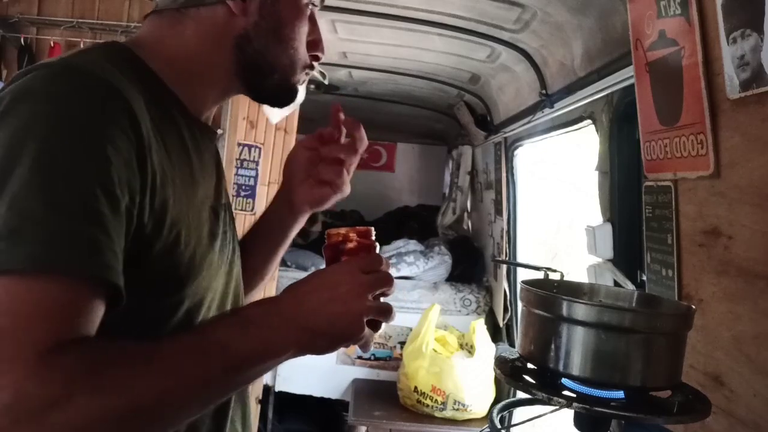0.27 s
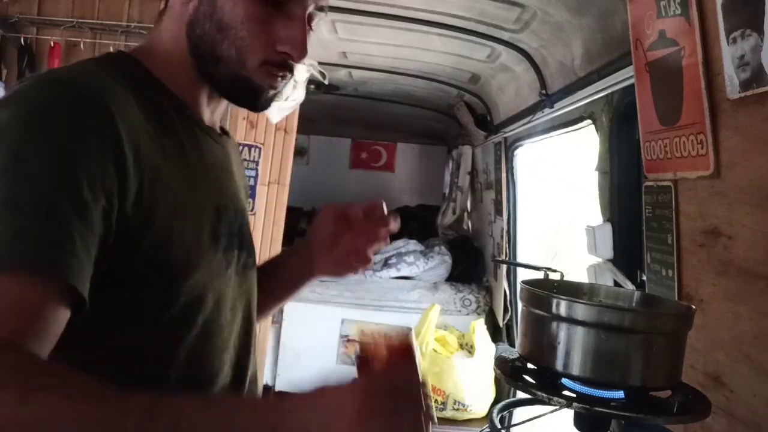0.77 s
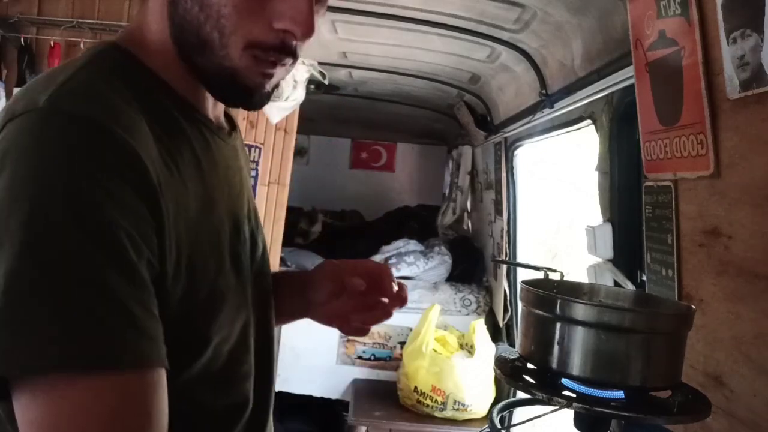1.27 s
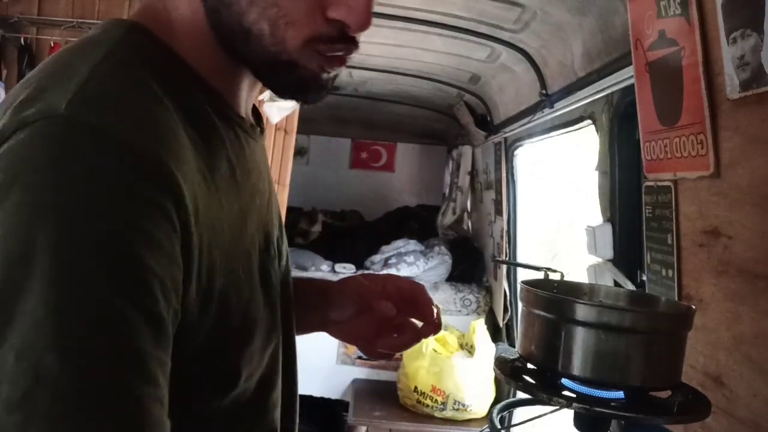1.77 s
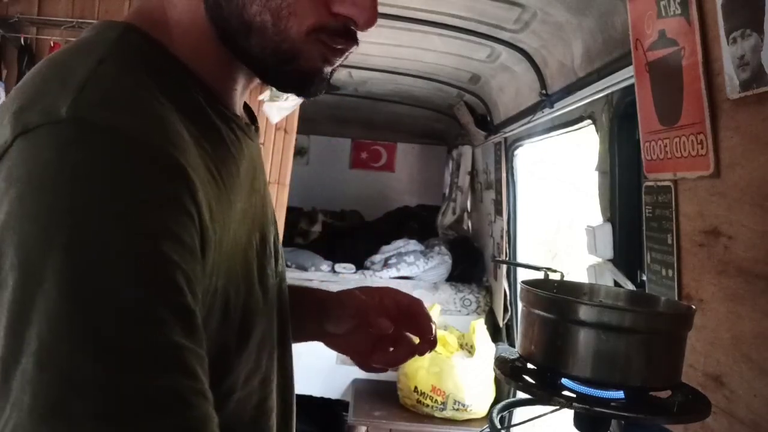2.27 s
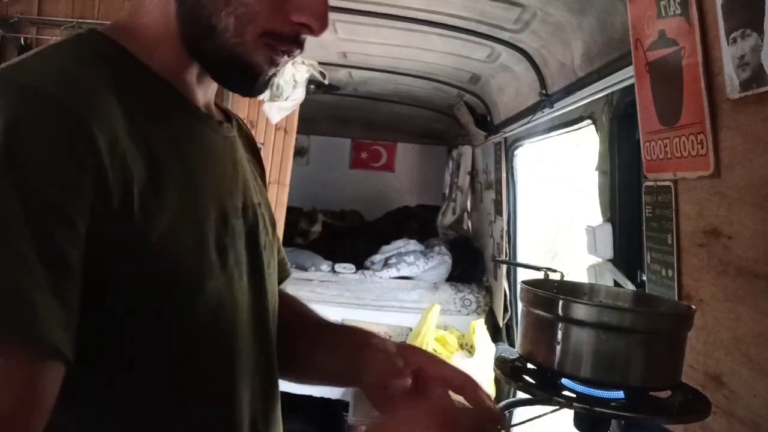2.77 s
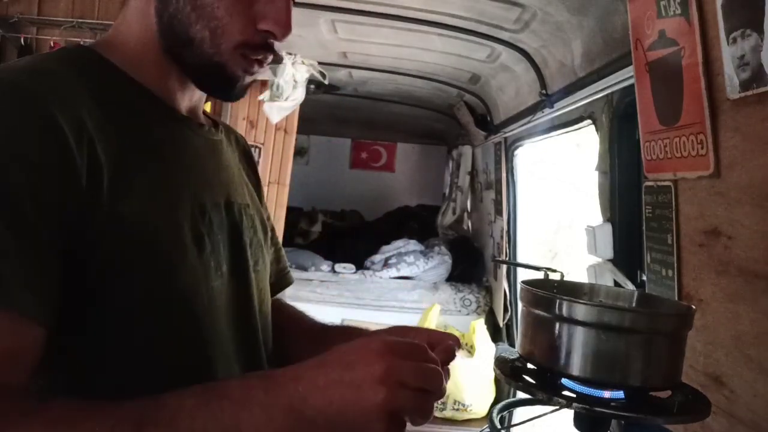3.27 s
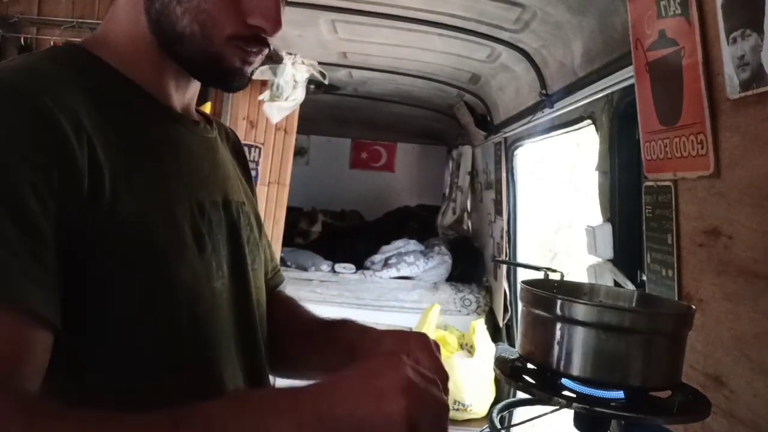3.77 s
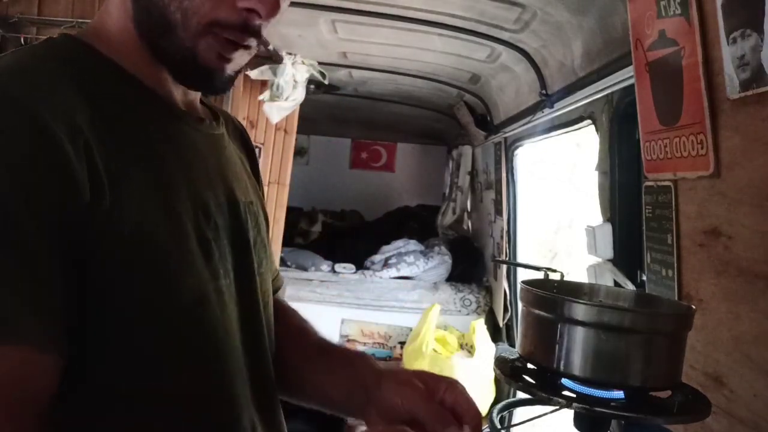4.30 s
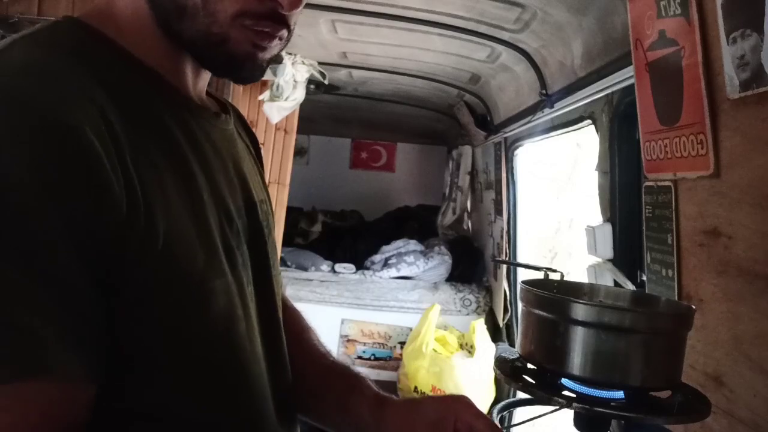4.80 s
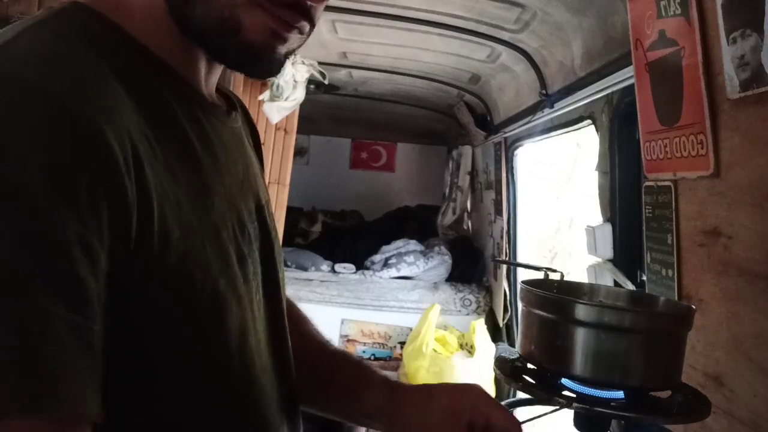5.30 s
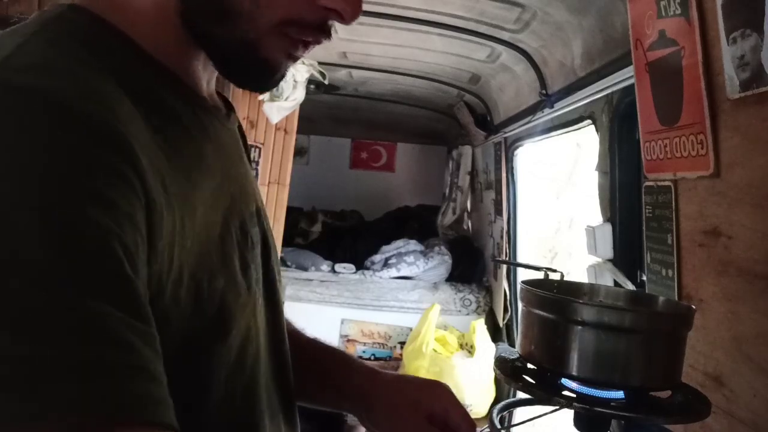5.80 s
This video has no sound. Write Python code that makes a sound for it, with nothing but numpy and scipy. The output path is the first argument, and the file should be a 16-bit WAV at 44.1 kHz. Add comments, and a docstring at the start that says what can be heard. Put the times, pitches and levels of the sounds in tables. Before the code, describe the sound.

Steady fluttering gas flame under a pot, with a bouncing wooden knock early on and scattered dry ticks and tiny crackles from busy hands.

```python
"""Gas ring in a cramped van kitchen

A pot's gas flame is two bands of fluttering noise; its jet hiss is broad noise plus flickering resonances.
Something set down on the wooden worktop knocks and bounces: soft pushes ring the board's modes.
Small things tick and crackle in a cook's hands: rattle bursts through resonators, and grainy noise.
Two spaced ports hear it, with close reflections on the handling; the finished sound is thin
from 9 to 11.5 kHz."""
import sys
import numpy as np
from scipy import signal
from scipy.fft import rfft, irfft, next_fast_len
from scipy.io import wavfile
from scipy.ndimage import uniform_filter1d, map_coordinates

SR = 44100
rng = np.random.default_rng(int(sys.argv[2]) if len(sys.argv) > 2 else 0)


def pcm_store(signal):
    """Save signal as 16-bit PCM."""
    levels = np.round(np.clip(np.atleast_2d(signal), -1, 1) * 32767)
    wavfile.write(sys.argv[1], SR, levels.astype(np.int16).T)


N = 266805
LENGTH = next_fast_len(N)
HZ = np.maximum(np.arange(LENGTH // 2 + 1) * SR / LENGTH, 1)

# Low flame roar spectrum. Each row: frequency in Hz, relative density in dB.
LOW_ROAR_SPECTRUM = [(15, -77), (25, -56), (48, -52), (58, -26), (101, -5), (145, -1), (248, -2),
                     (279, -0.5), (312, -19), (340, -28), (440, -80), (750, -120)]
# Upper flame roar spectrum. Each row: frequency in Hz, relative density in dB.
UPPER_ROAR_SPECTRUM = [(200, -20.5), (340, 2.5), (355, -3), (489, 2.5), (584, -6.5), (917, -16), (992, -19),
                       (1100, -19), (1430, -25.5), (2420, -120)]
# Low roar loudness. Each row: time in seconds, level in dB.
LOW_ROAR_LEVEL = [(0.0, -44), (0.3, -46.5), (0.74, -44.5), (1.4, -43.5), (2.17, -45.5), (3.57, -43.5),
                  (3.82, -47), (4.2, -43), (4.7, -45.5), (6.05, -44)]
# Upper roar loudness. Each row: time in seconds, level in dB.
UPPER_ROAR_LEVEL_DB = [(0, -54), (1.2, -53.5), (2.5, -53.5), (3.5, -55), (4.8, -53.5), (6.05, -53.5)]
# Roar power shared by the ports. Each row: frequency in Hz, share from 0 to 1.
ROAR_SHARED = [(30, 0.57), (130, 1), (300, 0.9), (500, 1), (650, 0.55), (800, 0.44), (1100, 0.084)]
# Roar balance. Each row: frequency in Hz, left minus right in dB.
ROAR_PAN = [(60, 0.5), (200, -1.5), (380, -5), (700, 1), (1200, 1.5)]
# Roar phase between ports. Each row: frequency in Hz, left lead in radians.
ROAR_LEAD = [(30, -0.16), (200, -0.055), (500, -0.74), (1100, -0.64)]

# Broad jet noise spectrum. Each row: frequency in Hz, relative density in dB.
JET_SPECTRUM = [(500, -8), (900, -16), (1500, -8.5), (2000, -9), (2600, -11), (3500, -11), (4700, -10.5),
                (5100, -14), (6000, -13.5), (7000, -19), (7800, -12), (8300, -18), (11800, -21),
                (12700, -27), (14000, -15.5), (15000, -18), (16000, -5.5)]
# Burner resonances in the hiss. Each row: frequency in Hz, nominal width in Hz, left and right relative dB.
BURNER_MODES = [(3200, 260, -16, -8), (3500, 260, -5, -8), (3750, 140, -2, 3), (3990, 200, 0, -1),
                (4300, 280, -3.5, -7), (4620, 220, -7, -7), (5380, 110, -1, -11), (5590, 120, -7, -15),
                (6270, 300, -1, -6), (6650, 340, -7, -9), (7080, 340, -10, -24), (7500, 260, -7, -10),
                (8450, 170, -14, -4), (13100, 350, -19, -16), (14350, 400, -14, -8)]
# Hiss phase between ports, also used for rustles. Each row: frequency in Hz, left lead in radians.
JET_LEAD = [(0, 0), (1500, -2.5), (2000, -4), (2600, -3.5), (3100, -4.8), (3400, -6.3), (3750, -8.5),
            (4100, -7.7), (4400, -5.8), (5000, -9.3), (5350, -12.6), (6000, -9.9), (6300, -11.2),
            (7000, -12.6), (8400, -15.9), (9500, -18.8), (12200, -22.6), (13000, -25.6), (13400, -23),
            (14200, -24.6), (14800, -27.5), (16000, -27)]
JET_DB, FLICKER_DB = -55.5, 1.8
JET_SHARED, BURNER_SHARED = .2, .75   # share of power common to both ports

# Ticks and crackles. Each row: time in seconds, lower pitch in Hz, its relative level in dB,
# upper pitch in Hz, its relative level in dB, rattle t60 in seconds (held to 0.01-0.2).
TICK_EVENTS = [(1.0265, 1340, -42.5, 6800, -59, 0.01), (1.1544, 3090, -43.5, 12040, -42.5, 0.063),
               (1.1566, 2200, -40, 1280, -47, 0.038), (1.188, 3500, -55, 6870, -55, 0.023),
               (1.202, 4400, -49, 6900, -48.5, 0.068), (1.207, 1160, -41, 3200, -67, 0.029),
               (1.3412, 980, -47.5, 5600, -54, 0.087), (1.4362, 1460, -44, 6760, -49.5, 0.11),
               (1.4415, 2550, -52, 3640, -47, 0.077), (1.461, 3750, -49.5, 6800, -71, 0.06),
               (1.8076, 2480, -56.5, 6800, -51, 0.071), (1.897, 2130, -53, 13000, -49, 0.019),
               (1.9382, 1030, -45, 2420, -56, 0.067), (1.947, 2870, -39, 3490, -44, 0.02),
               (1.958, 3300, -51, 6400, -68, .015), (2.505, 6340, -43.5, 7200, -52, 0.041),
               (2.5058, 1080, -45, 2000, -43.5, 0.033), (2.5085, 3730, -42, 6300, -52, 0.023),
               (2.515, 1000, -60, 3500, -44.5, 0.036), (2.556, 2200, -57, 6300, -64, 0.017),
               (2.617, 2100, -56, 12000, -52, 0.027), (2.599, 1400, -54, 9000, -57, 0.037),
               (3.0496, 800, -54, 4940, -49, 0.021), (3.267, 6400, -44, 7400, -57, 0.013),
               (3.2735, 1120, -46, 5300, -42, 0.04), (3.2738, 2200, -36.5, 3200, -36, 0.022),
               (3.2805, 2280, -47, 3490, -48, .015), (3.2988, 2110, -56, 7400, -52.5, 0.062),
               (4.038, 5700, -40, 7640, -45.5, 0.032), (4.0440, 2390, -36, 3300, -44, 0.011),
               (4.0437, 5000, -60, 7260, -49, 0.015), (4.0828, 1210, -46.5, 2480, -48, 0.076),
               (4.106, 4800, -46, 6400, -50, 0.034), (4.221, 800, -70, 6800, -47.5, .02),
               (4.2463, 830, -37, 1290, -37, 0.009), (4.2463, 2120, -45, 680, -36, .01),
               (4.2525, 820, -44, 1500, -53, .02), (4.259, 840, -53, 1510, -50, 0.03),
               (4.8525, 7550, -41.5, 12800, -39, 0.019), (4.9088, 3300, -43, 1300, -56, 0.018),
               (4.917, 1330, -45, 6600, -39.5, 0.045), (4.9208, 800, -51, 12000, -55, 0.023),
               (4.9664, 5000, -46, 13000, -45, 0.046), (4.986, 4470, -44, 12000, -48, 0.035),
               (5.0165, 1940, -52, 6800, -55, 0.05), (5.1896, 1150, -45, 7300, -49, 0.027),
               (5.2005, 3280, -45.5, 7430, -42.5, 0.048), (5.2075, 1280, -48, 12000, -46, 0.022),
               (5.3648, 7300, -46.5, 5400, -50, 0.021), (5.6483, 3500, -55, 6800, -56, 0.024),
               (5.682, 970, -45, 4500, -52, 0.038), (5.7262, 2960, -52.5, 6950, -51.5, 0.093),
               (5.804, 6600, -47, 13000, -50, 0.048), (5.8317, 2220, -56.5, 13000, -45.5, .03),
               (5.872, 2050, -54, 6800, -42, 0.016)]
# Resonances of the small things. Each row: frequency in Hz, nominal width in Hz, relative level in dB.
SMALL_MODES = [(680, 170, -6), (820, 120, 2), (1080, 220, -2), (1280, 260, -6), (1460, 240, -3),
               (1650, 260, -6), (2040, 190, 1), (2280, 220, -1), (2550, 240, -5), (2870, 200, -5),
               (3200, 200, 0), (3490, 210, -1), (3730, 200, -1), (4000, 260, -4), (4350, 350, -5),
               (4800, 400, -6), (5300, 350, -4), (6280, 360, -5), (6800, 360, -7), (7350, 320, -1),
               (8340, 500, -6), (11530, 1900, -3), (13700, 1800, -6), (14700, 1800, 2)]
TICK_RISE_S, TICK_PEAK_S, TICK_LAG_S = .0009, .001, .00011   # e-fold rise, peak delay, right port's lag
SNAP_DB, TICK_SCATTER_DB = 14, 2
# modes nearest a pitch stand out of a broad spread
TICK_NEAR_DB_PER_OCTAVE, TICK_SPREAD_DB, TICK_FALL_DB_PER_OCTAVE = 80, -7, 15

# Blows on the worktop. Each row: time in seconds, relative strength in dB, contact sharpness in Hz,
# spot (0 first, 1 where it bounces to).
BLOWS = [(1.055, -15.5, 59, 0), (1.066, -12.5, 66, 0), (1.3412, -35, 350, 0), (1.4345, -15, 415, 0),
         (1.4381, -21, 460, 0), (1.4421, -7.5, 340, 0), (1.6059, -22.5, 212, 1), (1.6115, -17, 242, 1),
         (1.637, -24, 117, 1), (1.668, -28, 122, 1), (1.6937, -27, 107, 1), (1.752, -31, 120, 1),
         (4.815, -25, 70, 0)]
# Worktop modes. Each row: frequency in Hz, relative level in dB, t60 in seconds, left minus right in dB.
WORKTOP_MODES = [(106, -18.5, 0.17, -2), (124, -27, 0.6, -1.5), (142, -20, 0.17, -2.5), (161, -4, 0.14, -1),
                 (193, -17, 0.24, 0.5), (240, -9, 0.06, -3), (295, -8.5, 0.11, -6), (336, -2.5, 0.052, 1.5),
                 (423, -11, 0.115, 0), (492, -20.5, 0.17, -2), (565, -4, 0.064, -1.5), (621, -9, 0.078, 0),
                 (680, -10, 0.085, 2.5), (808, -13.5, 0.06, -1), (837, -7.5, 0.066, 12),
                 (951, -8, 0.078, 11), (1040, -13.5, 0.065, -7), (1232, -15, 0.06, 1)]
# Extra drive of the modes from the second spot. Each row: frequency in Hz, gain in dB.
SECOND_SPOT_DRIVE = [(106, -3), (161, 2.5), (240, -3), (336, -8), (423, -2), (492, 6), (565, 5), (680, 0),
                     (808, -7), (951, -1), (1040, -8)]
KNOCK_LAG_S = .0002   # right port's lag

# Rustles of a wrapper or skin. Each row: middle in seconds, half length in seconds, level in dB.
RUSTLE_SWELLS = [(1.16, .006, -60), (1.444, .010, -55), (1.456, .009, -60), (2.512, .008, -59),
                 (2.605, .015, -65), (3.278, .007, -58), (4.045, .006, -60), (4.092, .014, -63),
                 (4.918, .010, -57), (4.97, .004, -58), (4.99, .004, -58), (5.01, .015, -64),
                 (5.203, .013, -55), (5.236, .005, -65), (5.368, .004, -61), (5.79, .025, -65),
                 (5.878, .01, -62)]
# Rustle spectrum. Each row: frequency in Hz, relative density in dB.
RUSTLE_SPECTRUM = [(600, -30), (1200, -7), (2500, -7), (3500, -4), (5000, -7), (7300, 0), (8500, -5),
                   (12000, -3), (16000, -3)]
RUSTLE_GRAINS_PER_S, RUSTLE_SHARED = 7000, .5

CABIN_T60_S, ALIKE_BELOW_HZ = 0.14, 200
WALL_BASS_HZ, WALL_CUT_HZ = 296, 11000
TICK_ECHO_DB, KNOCK_ECHO_DB = -15, -14

# Overall tone colour, thin from 9 to 11.5 kHz. Each row: frequency in Hz, gain in dB.
OVERALL_COLOUR = [(20, -0.5), (8500, 0.5), (8600, -8), (9100, -2.5), (9500, -11), (11000, -14.5),
                  (11400, -51), (11650, 3), (13000, 4), (20000, -12.5)]
CUTOFF_HZ = 15780


def from_db(db):
    """Decibels to gain."""
    return 10 ** (np.asarray(db) / 20)


def rms_one(x):
    """Scale to rms 1."""
    return x / np.sqrt(np.mean(x ** 2) + 1e-20)


def at_hz(points):
    """A (Hz, value) table read at every bin, straight on a log axis."""
    hz, value = np.transpose(points)
    return np.interp(np.log(HZ), np.log(hz), value)


def at_time(points):
    """A (s, value) table read at every sample."""
    return np.interp(np.arange(N) / SR, *np.transpose(points))


def drift(knots_per_s):
    """Slow smooth chance through random knots; knot spread 1."""
    knots = rng.standard_normal(400)
    return map_coordinates(knots, [np.arange(N) / SR * knots_per_s], order=3, mode="wrap")


def stereo_noise(gains, share, lead_table):
    """Two ports share part of a noise, shifted in phase by its paths; the rest is their own. rms 1."""
    shared, left, right = rfft(rng.standard_normal((3, LENGTH)))
    share = np.clip(share, 0, 1)
    lead_rad = np.interp(HZ, *np.transpose(lead_table))
    common = np.sqrt(share) * shared * np.array([np.exp(1j * lead_rad), np.ones_like(HZ)])
    own = np.sqrt(1 - share) * np.array([left, right])
    return rms_one(irfft(gains * (common + own), LENGTH)[:, :N])


def roar(spectrum, level_db, flutter_db):
    """Turbulent burning: low noise that flutters a little."""
    side_db = at_hz(ROAR_PAN) / 2
    gains = from_db(at_hz(spectrum) + np.array([side_db, -side_db]))
    noise = stereo_noise(gains, at_hz(ROAR_SHARED), ROAR_LEAD)
    return from_db(level_db + flutter_db * drift(12.0)) * noise


def jet(level_db):
    """Gas leaving the ports: diffuse broad noise plus burner resonances that both ports share more."""
    broad = from_db(at_hz(JET_SPECTRUM))
    hiss = np.sqrt(np.mean(broad ** 2)) * stereo_noise(broad, JET_SHARED, JET_LEAD)
    for first in range(3):   # three interleaved groups, each with its own flicker
        power = 0
        for hz, width_hz, left_db, right_db in BURNER_MODES[first::3]:
            detuning = (HZ / hz - hz / HZ) * hz / width_hz
            power = power + from_db([[left_db], [right_db]]) ** 2 / (1 + detuning ** 2) ** 2
        ringing = np.sqrt(np.mean(power)) * stereo_noise(np.sqrt(power), BURNER_SHARED, JET_LEAD)
        hiss = hiss + from_db(FLICKER_DB * drift(17.0)) * ringing
    return from_db(level_db + 0.25 * drift(22.13)) * rms_one(hiss)


def ticks():
    """A brief rattle swells, dies and excites the modes, most those near its two pitches."""
    out, t = np.zeros((2, N + SR)), np.arange(-SR // 40, SR // 10) / SR
    for s, low_hz, low_db, high_hz, high_db, t60_s in TICK_EVENTS:
        shared, left, right = rng.standard_normal((3, len(t)))
        struck_db = rng.normal(0, TICK_SCATTER_DB, len(SMALL_MODES))   # each contact favours other modes
        swell = np.exp((t - TICK_PEAK_S) / TICK_RISE_S)
        fade = from_db(-60 * (t - TICK_PEAK_S) / np.clip(t60_s, .01, .2))
        envelope = np.minimum(swell, fade)
        shared[np.argmax(envelope)] = from_db(SNAP_DB)   # the hardest contact is one clean snap
        # the left port is nearer the hands
        heard = np.array([shared, np.roll(shared, round(TICK_LAG_S * SR))])
        burst = envelope * (0.79 * heard + 0.67 * np.array([left, right]))
        sound = 0
        for k, (hz, width_hz, db) in enumerate(SMALL_MODES):
            octaves = np.abs(np.log2(hz / np.array([low_hz, high_hz])))
            near_db = -TICK_NEAR_DB_PER_OCTAVE * octaves
            spread_db = TICK_SPREAD_DB - TICK_FALL_DB_PER_OCTAVE * octaves
            near = np.hypot(*from_db([low_db, high_db] + np.maximum(near_db, spread_db)))
            peak, skirt = [signal.iirpeak(hz, hz / width_hz * q, SR) for q in (1.5, .45)]
            # a wide pass first, for steep flanks
            ringing = signal.lfilter(*peak, signal.lfilter(*skirt, burst))
            ringing = ringing / np.sqrt(np.mean(ringing ** 2) / np.mean(envelope ** 2))
            sound = sound + near * from_db(db + struck_db[k]) * ringing * (-1) ** k
        at = round((s + t[0]) * SR)
        out[:, at:at + len(t)] += sound
    return out[:, :N]


def worktop():
    """Each blow is a short soft push that sets all modes ringing."""
    push, t = np.zeros((2, N)), np.arange(SR // 10) / SR
    for s, db, contact_hz, spot in BLOWS:
        shape = t ** 3 * np.exp(-4 * np.pi * t * contact_hz)
        at = round(s * SR)
        push[spot, at:at + len(t)] -= from_db(db) * shape / shape.sum()
    out = 0
    for hz, db, t60_s, pan_db in WORKTOP_MODES:
        r, w = from_db(-60 / (t60_s * SR)), 2 * np.pi * hz / SR
        second_gain = from_db(np.interp(hz, *np.transpose(SECOND_SPOT_DRIVE)))
        drive = push[0] + second_gain * push[1] + 1e-18
        # the air follows the board's speed
        mode = signal.lfilter([.5, 0, -.5], [1, -2 * r * np.cos(w), r * r], drive)
        out = out + from_db(db + pan_db * np.array([[.5], [-.5]])) * mode
    out[1] = np.roll(out[1], round(KNOCK_LAG_S * SR))
    # thick wood radiates no deep bass and little treble
    band = signal.butter(3, [80.0, 1400.0], "band", fs=SR, output="sos")
    return signal.sosfilt(band, out)


def rustle():
    """Dense crackle of tiny uneven grains under each swell."""
    t = np.arange(N) / SR
    swell = sum(from_db(db) * np.exp(-((t - s) / half_s) ** 2) for s, half_s, db in RUSTLE_SWELLS)
    grains = (rng.random(N) < RUSTLE_GRAINS_PER_S / SR) * rng.exponential(1, N)
    grainy = rms_one(uniform_filter1d(grains, size=13))
    noise = stereo_noise(from_db(at_hz(RUSTLE_SPECTRUM)), RUSTLE_SHARED, JET_LEAD)
    return swell * rms_one(grainy * noise)


def cabin(x, echo_db):
    """Close walls: a dense dying spray of reflections, alike at both ports only in the bass."""
    t = np.arange(SR // 4) / SR
    decay = from_db(-60 * t / CABIN_T60_S) * (t > .003)
    shared, *own = rng.standard_normal((3, len(t))) * decay
    low, high = [signal.butter(2, ALIKE_BELOW_HZ, kind, fs=SR, output="sos") for kind in ("low", "high")]
    spray = signal.sosfilt(low, shared) + signal.sosfilt(high, own)
    spray = spray / np.sqrt(np.sum(spray ** 2, axis=1, keepdims=True))
    # thin panels let the bass out, furnishings swallow the treble
    walls = signal.butter(1, [WALL_BASS_HZ, WALL_CUT_HZ], "band", fs=SR, output="sos")
    spray = signal.sosfilt(walls, spray)
    return x + from_db(echo_db) * signal.fftconvolve(x, spray, axes=1)[:, :N]


def scene():
    """Flame and jet, then ticks, knocks and rustles with their cabin reflections."""
    flame = roar(LOW_ROAR_SPECTRUM, at_time(LOW_ROAR_LEVEL), flutter_db=-0.7)
    flame = flame + roar(UPPER_ROAR_SPECTRUM, at_time(UPPER_ROAR_LEVEL_DB), flutter_db=0.26)
    hands = cabin(ticks() + rustle(), TICK_ECHO_DB)
    knocks = cabin(worktop(), KNOCK_ECHO_DB)
    return flame + jet(JET_DB) + hands + knocks


def record(dry):
    """Overall tone colour, thin from 9 to 11.5 kHz, then the top is cut."""
    coloured = irfft(rfft(dry, LENGTH) * from_db(at_hz(OVERALL_COLOUR)), LENGTH)[:, :N]
    top_cut = signal.ellip(12, .5, 60, CUTOFF_HZ, fs=SR, output="sos")
    return signal.sosfilt(top_cut, coloured)


dry = scene()
out = record(dry)
pcm_store(out)
```